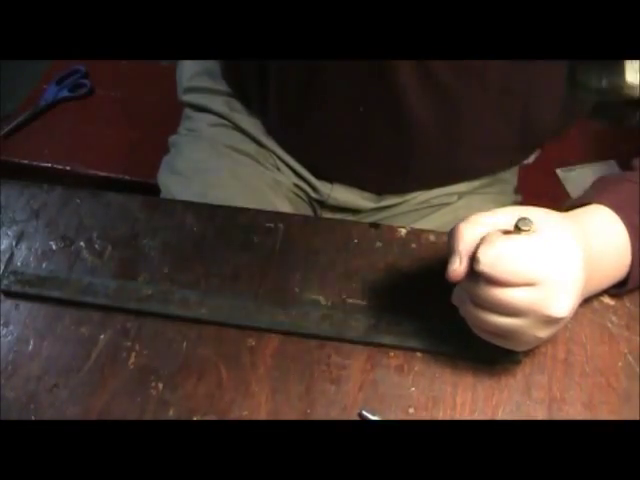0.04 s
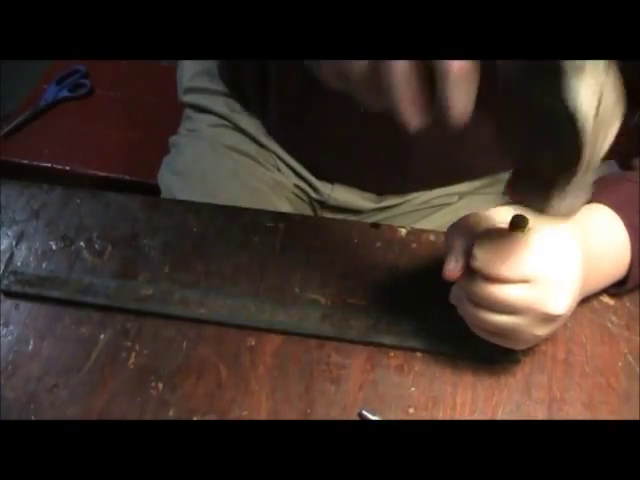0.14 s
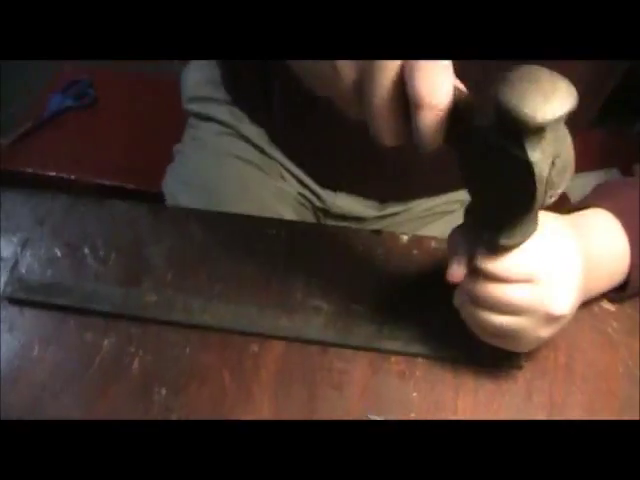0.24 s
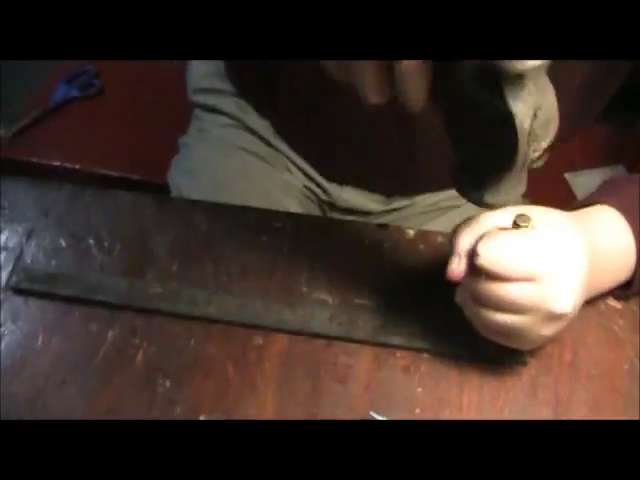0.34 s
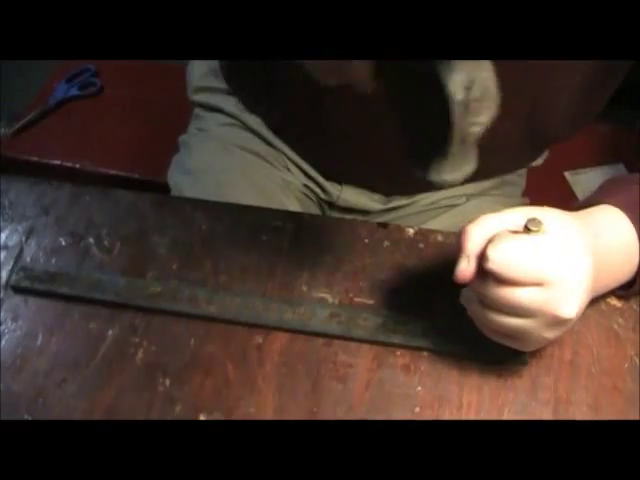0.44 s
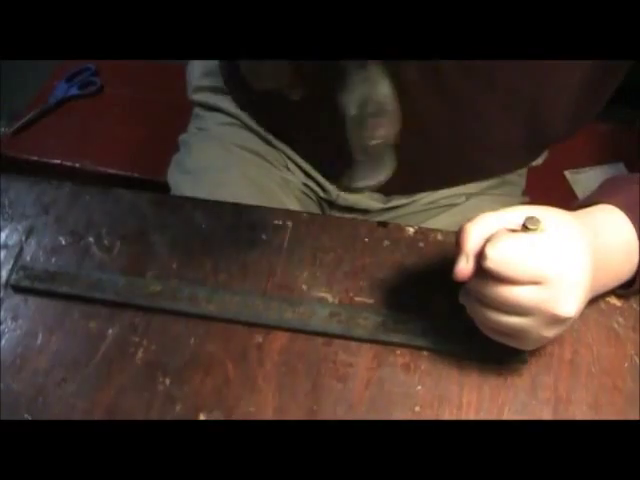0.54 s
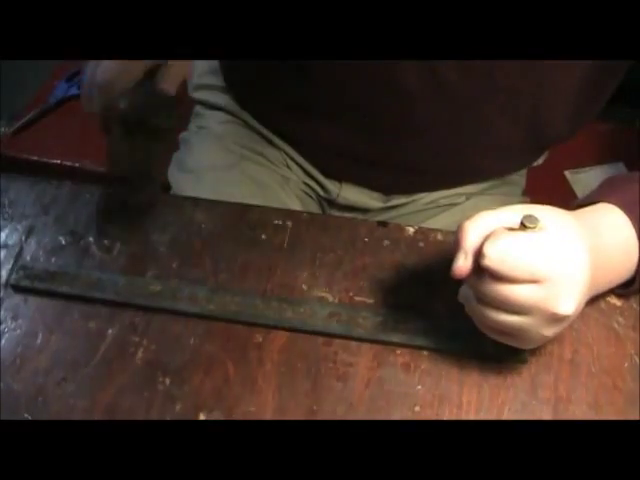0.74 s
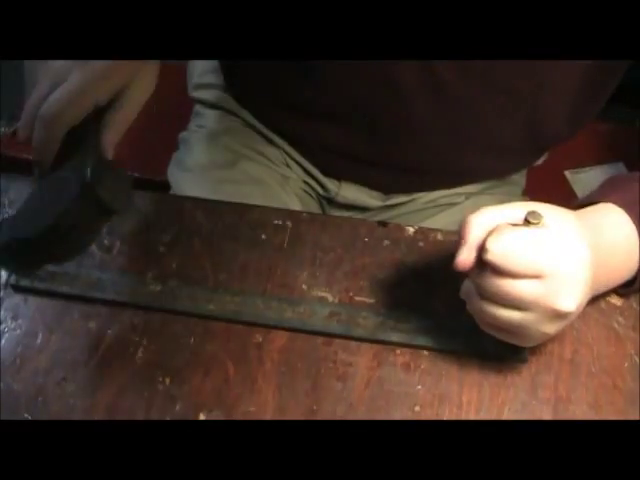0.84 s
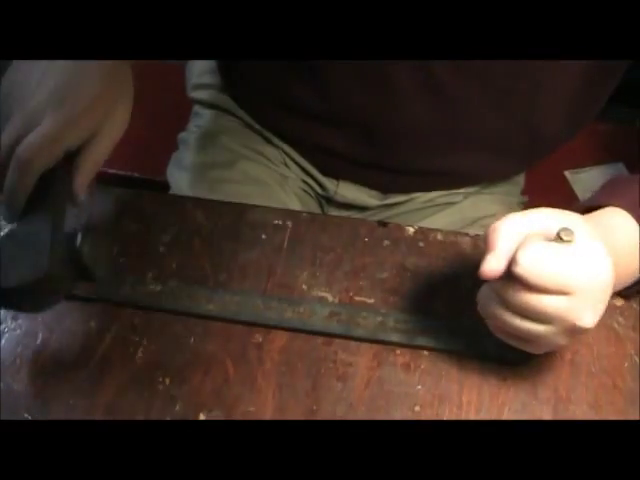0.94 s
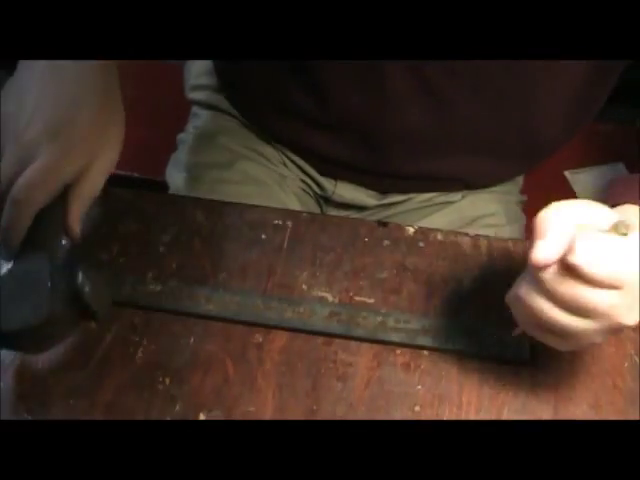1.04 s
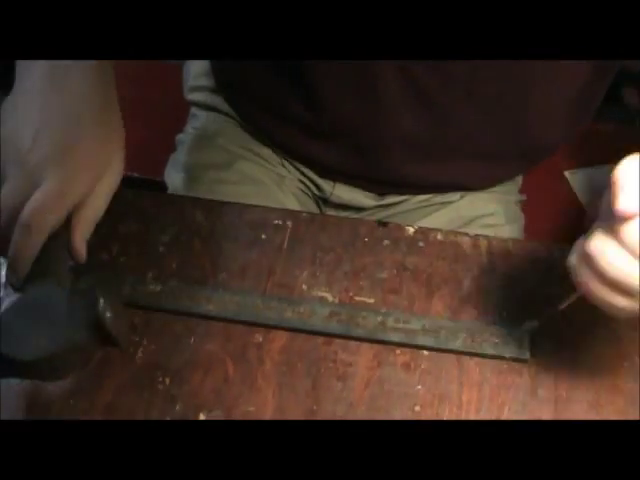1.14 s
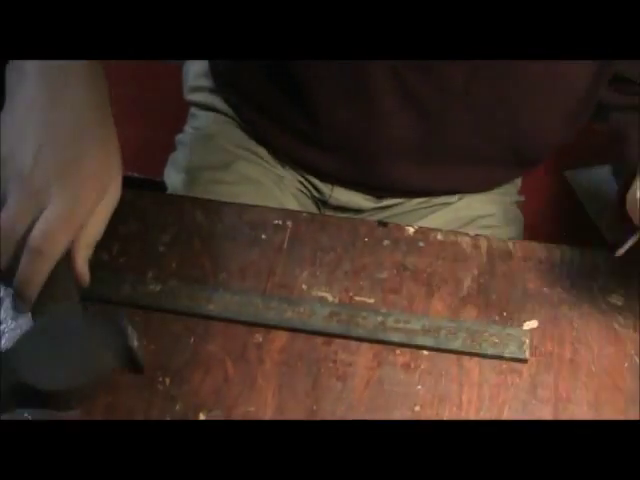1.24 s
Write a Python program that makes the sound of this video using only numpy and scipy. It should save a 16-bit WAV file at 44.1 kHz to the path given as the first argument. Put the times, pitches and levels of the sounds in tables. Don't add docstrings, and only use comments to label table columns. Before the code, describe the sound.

One hard hammer strike on metal at a workbench, bar rattling to rest with thin ringing

```python
import sys
import numpy as np
from scipy import signal
from scipy.fft import rfft, irfft
from scipy.io import wavfile
from scipy.ndimage import uniform_filter1d

SR = 44100
rng = np.random.default_rng(int(sys.argv[2]) if len(sys.argv) > 2 else 0)


def volts_from_decibels(level):
    exponent = np.asarray(level, float) / 20
    return 10 ** exponent


def unload_audio(sound):
    columns = np.transpose(np.atleast_2d(sound))
    steps = np.round(np.clip(columns, -1, 1) * 32767)
    wavfile.write(sys.argv[1], SR, steps.astype(np.int16))


N = 57330
T = np.arange(N) / SR
BLOW_S = .2114


def evened(x):
    return x / np.sqrt(np.mean(x ** 2) + 1e-20)


def read(points, hz):
    f, value = np.transpose(points)
    return np.interp(np.log(hz + 1), np.log(f + 1), value)


def curve(table, column):
    rows = np.array(table)
    return np.interp(T, rows[:, 0], rows[:, column])


def colour(x, points):
    log_gain = np.log(volts_from_decibels(read(points, abs(np.fft.fftfreq(4096, 1 / SR)))))
    phase = -signal.hilbert(log_gain).imag
    taps = np.fft.ifft(np.exp(log_gain + 1j * phase)).real[:2048]
    return signal.oaconvolve(x, taps[None] / np.linalg.norm(taps), axes=1)[:, :N]


def pair(same, source=None):
    middle, side = rng.standard_normal((2, N))
    if source is not None:
        middle, side = source, source * np.sign(side)
    likeness = np.clip(read(same, np.fft.rfftfreq(N, 1 / SR)), 0, 1)
    m = np.sqrt((1 + likeness) / 2) * rfft(middle)
    s = np.sqrt((1 - likeness) / 2) * rfft(side)
    return irfft(np.array([m + s, m - s]), N)


def fall(start_s, t60, rise=.0002):
    t = np.maximum(T - start_s, 0)
    return np.minimum(t / rise, 1) * volts_from_decibels(-60 * t / t60)


def banded(x, start_s, t60s):
    octave = np.log2(np.fft.rfftfreq(N, 1 / SR) + 1)
    spectrum, out = rfft(x), 0
    elapsed = np.maximum(T - start_s, 0)
    for k in range(4, 16):
        share = np.clip(1 - abs(octave - k), 0, 1)
        out = out + irfft(spectrum * share, N) * volts_from_decibels(-60 * elapsed / read(t60s, 2. ** k))
    return out


def modes(start_s, rows):
    out = 0
    for hz, db, t60, rise in rows:
        phase, skew = rng.random(2) * [1, .04]
        if hz <= 150:
            phase = 1 / 4
        turns = hz * (T - start_s) + phase + np.array([[0], [skew]])
        out = out + volts_from_decibels(db) * fall(start_s, t60, rise) * np.sin(2 * np.pi * turns)
    return out


# f/Hz, t60/s
ROOM_T60 = [(100, 0.82), (500, 0.81), (2000, 0.42), (6000, 0.14), (14000, 0.38)]
ROOM_DB = -18.5


def room(x):
    taps = np.zeros((2, N))
    at = np.arange(200, N - 20, 20) + rng.integers(0, 20, (2, (N - 201) // 20))
    np.put_along_axis(taps, at, rng.choice([-1., 1.], at.shape), 1)
    tail = banded(taps + 0.69 * taps[::-1], 0, ROOM_T60)
    return signal.fftconvolve(x.mean(0)[None], tail / np.linalg.norm(tail[0]), axes=1)[:, :N]


# t/s, rumble level/dB, hum offset/dB, hiss level/dB
BACKGROUND = [(0, -47, 3, -124), (.1, -49.5, 2.5, -67), (.2, -51.5, -1, -65), (.3, -59, -6, -87),
              (.72, -44, -1.5, -95), (.81, -43.5, 1.5, -60.5), (.9, -43.5, 3.5, -56.5),
              (1.0, -43, 5.5, -55.5), (1.12, -45.5, 6, -62.5), (1.3, -48, 3.5, -51)]
# f/Hz, level per Hz/dB
RUMBLE = [(20, -22.5), (60, 3), (185, -1.5), (550, 1), (700, -5), (3000, -12.5), (8000, -31.5),
          (15400, -46.5)]
# f/Hz, level per Hz/dB
HISS = [(1500, -23), (4000, 0.5), (7000, -0.5), (11000, -11), (13500, -11.5), (15000, -32)]
# f/Hz, left-right likeness/0-1
AIR_SAME = [(60, 0.77), (240, 0.8), (950, 0.68), (3770, 0.17), (15000, 0.068)]
# f/Hz, left minus right/dB
LEAN = [(60, -3.5), (240, -0.5), (950, -1), (3770, -1.5), (15000, -14)]


def air():
    lean = volts_from_decibels(np.array([[.5], [-.5]]) * read(LEAN, np.fft.rfftfreq(N, 1 / SR)))
    rumble = irfft(rfft(colour(pair(AIR_SAME), RUMBLE)) * lean, N)
    hiss = colour(pair(AIR_SAME), [(20, -78)] + HISS)
    return rumble * volts_from_decibels(curve(BACKGROUND, 1)) + hiss * volts_from_decibels(curve(BACKGROUND, 3))


# f/Hz, level/dB
HUM = [(59.2, -64.5), (177.6, -56.5), (236.9, -57.5), (296.1, -64), (423, -59.5), (483, -59.5),
       (565.2, -52.5), (646.0, -66.5)]
HUM_WAVER_HZ, HUM_NOISE_DB = 8, -12


def hum():
    r, out = np.exp(-np.pi * HUM_WAVER_HZ / SR), 0
    for hz, db in HUM:
        a, b = rng.standard_normal((2, N))
        halo = signal.lfilter([1], [1, -r], a + 1j * b) * np.sqrt((1 - r * r) / 2)
        carrier = np.exp(2j * np.pi * (hz * T + rng.random()))
        out = out + volts_from_decibels(db) * np.sqrt(2) * ((1 + volts_from_decibels(HUM_NOISE_DB) * halo) * carrier).real
    return out * volts_from_decibels(curve(BACKGROUND, 2)) * volts_from_decibels(np.array([[-1.2], [1.2]]))


# f/Hz,
# level/dB, t60/s, rise/s
KNOCKS = [(3700, -22, .003, .0003), (4500, -20, .005, .0003), (6500, -26, .006, .0003),
          (6900, -23, .01, .0003), (1110, -31, .075, .002), (560, -31, .03, .0015), (620, -34, .03, .001),
          (570, -39, .04, .002), (1100, -43, .12, .001), (2230, -51.5, .4, .012), (1160, -44, .2, .003),
          (1850, -44, .03, .001), (2330, -55, .2, .01), (4000, -58, .3, .01), (3800, -55, .1, .003)]
KNOCK_AT = [.9088, .4035, .4355, .478, .9278, .9285, .953, 1.001, .74, 1.25, .897, .935, 1.283, 1.272,
            1.218]


def knocks():
    return sum(modes(s, [row]) for s, row in zip(KNOCK_AT, KNOCKS))


# level/dB, t60/s, rise/s
RING = [(-46, 2.4, .03), (-37, 1.6, .03), (-27, .55, .09), (-39, .25, .004), (-57, 1.5, .01),
        (-50, .7, .005), (-44, .28, .004), (-47.5, .42, .004), (-55, .6, .05), (-58, .7, .02)]
# t/s, f/Hz
RING_AT = [(.629, 5670.9), (.45, 5661), (.476, 5661), (.376, 5661), (.25, 10757), (.376, 10757),
           (.449, 10757), (.498, 10757), (.52, 10768), (.26, 10985)]
IN_STEP_S = .633, .648
GRIP_S, GRIP_DB_PER_S = 1.08, 95


def ring():
    tone = 0
    for (start_s, hz), (db, t60, rise) in zip(RING_AT, RING):
        in_step_s = IN_STEP_S[int(hz > 8000)]
        tone = tone + volts_from_decibels(db) * fall(start_s, t60, rise) * np.sin(2 * np.pi * hz * (T - in_step_s))
    grip_db = GRIP_DB_PER_S * np.maximum(T - GRIP_S, 0)
    return np.sqrt(2) * tone * volts_from_decibels(np.array([[-3], [2.2]]) - grip_db)


# f/Hz, left-right likeness/0-1
HIT_SAME = [(60, 1), (240, 1), (950, 0.82), (3000, 0.37), (15000, 0.12)]
# t/s, level/dB, jingle level/dB
CHATTER = [(.23, -12, -64), (.27, -24.5, -43), (.35, -29, -79), (.39, -29, -33), (.44, -33.5, -33),
           (.48, -31, -31.5), (.53, -34, -32.5), (.6, -38.5, -53), (.7, -51.5, -91)]
# f/Hz, level per Hz/dB
CHATTER_TONE = [(60, -42), (150, 6.5), (400, -9), (1700, 4.5), (3200, 3), (6000, -6.5), (10500, -22),
                (12500, -45.5)]
# f/Hz, level per Hz/dB
JINGLE = [(1500, 0.5), (3500, 4.5), (7000, 1.5), (10000, -15), (12000, -28), (15000, -63)]
CHATTER_PER_S, CHATTER_SPREAD_DB = 6000, 2.2


def chatter():
    sizes = volts_from_decibels(CHATTER_SPREAD_DB * np.minimum(rng.exponential(1, N), 4))
    ticks = sizes * (rng.random(N) < CHATTER_PER_S / SR) * rng.choice([-1, 1], N)
    ticks = pair(HIT_SAME, evened(ticks))
    dull = colour(ticks, CHATTER_TONE) * volts_from_decibels(curve(CHATTER, 1))
    bright = colour(ticks, JINGLE) * volts_from_decibels(curve(CHATTER, 2))
    rest_db = 25 * np.maximum(T - CHATTER[-1][0], 0)
    return (dull + bright) * volts_from_decibels(np.array([[-1], [1]]) - rest_db) * (T > BLOW_S)


# f/Hz, level/dB, t60/s, rise/s
CONTACTS = [(4180, -6, 0.012, 0.00015), (9900, -19, 0.0062, .0002), (3010, -12, 0.014, 0.00027),
            (5340, -19, 0.013, 0.00027), (4740, -11.5, 0.012, .0001), (9670, -10.5, 0.004, .0001),
            (6660, -31, 0.015, .0003), (2480, -32, 0.016, 0.00033), (3050, -23, .025, 0.00038),
            (3270, -32, .015, 0.00013), (1320, -27, 0.022, 0.00041), (2600, -20, .015, 0.00023),
            (2020, -14.5, 0.0079, 0.00045)]
CONTACT_AT = [.3762, .3763, .3787, .3768, .4482, .4482, .4518, .4565, .5017, .5065, .503, .5235, .5265]


def contacts():
    return sum(modes(s, [row]) for s, row in zip(CONTACT_AT, CONTACTS))


# peak level/dB, first touch level/dB, gap to the full landing/ms, t60/s, hardness/0-1
LANDINGS = [
    (-14, -4, 3.5, .06, .2),
    (-12, -5, 2.6, .026, 1),
    (-13, 1, 2.7, .026, 1),
    (-15, -1, 3.2, .045, .65),
]
LANDING_AT = [.2685, .3737, .4481, .4978]
# f/Hz, level per Hz/dB
HARD = [(120, -39), (200, -14), (748, 0), (1540, -7), (3060, 6), (5360, -5), (6650, -3), (13200, -20.5),
        (15000, -67)]
# f/Hz, level per Hz/dB
SOFT = [(300, -2.5), (2500, 19), (5000, -18.5), (15000, -29)]
# f/Hz, level per Hz/dB
TICK = [(300, -12), (1000, 16), (3500, -5), (9000, 7.5), (14500, -46)]
# f/Hz, width/Hz, level/dB
BAR = [(2060, 140, 7.5), (2780, 210, 9), (3970, 330, -27.5), (5350, 130, -24), (6100, 280, -2),
       (6750, 227, 14), (8230, 160, -3), (11500, 310, -39.5)]
TICK_DB, CLACK_DB, LAND_PAN_DB = 10, -6, -2.5


def landings():
    noise, out, ticks = pair(HIT_SAME), 0, np.zeros((2, N))
    hard, soft = colour(noise, HARD), colour(noise, SOFT)
    bar = [(hz, db, 1.83 / width, 0.00062) for hz, width, db in BAR]
    for s, (db, touch_db, gap_ms, t60, hardness) in zip(LANDING_AT, LANDINGS):
        for at, part_db in ((s, touch_db), (s + gap_ms / 1000, 0)):
            burst = (hardness * hard + (1 - hardness) * soft) * fall(at, t60)
            clack = hardness * volts_from_decibels(CLACK_DB) * 0.67 * modes(at, bar)
            out = out + volts_from_decibels(db + part_db) * (0.9 * burst + clack)
            ticks[:, round(at * SR)] = hardness ** 2 * volts_from_decibels(db + part_db + TICK_DB)
    return (out + colour(ticks, TICK)) * volts_from_decibels(np.array([[.5], [-.5]]) * LAND_PAN_DB)


# f/Hz, level per Hz/dB
BLOW = [(30, -45), (110, -9), (300, -9), (600, -1), (1100, 0), (1550, -8), (2700, 0.5), (4500, -11.5),
        (7800, -6), (15000, -33.5)]
# f/Hz, t60/s
BLOW_T60 = [(60, 0.1), (300, 0.037), (1000, 0.033), (3000, 0.031), (8000, 0.0048), (15000, 0.0452)]
# f/Hz, level/dB, t60/s, rise/s
BENCH = [(453, -8.5, 0.13, 0.0058), (289.6, 12, 0.077, 0.01), (539.7, -2.5, 0.19, 0.0033),
         (1096, -2, 0.082, 0.0023), (1200, 3.5, .1, .005), (405.7, -8, 0.3, .008), (650.5, 0, 0.14, 0.0028),
         (240.3, -11, 0.35, 0.0062), (1817, -0.5, .12, 0.0031), (2332, -3.5, 0.13, 0.0031),
         (171.4, -4.5, 0.2, 0.012), (321, -3.5, 0.14, 0.0067), (775, -0.5, .1, 0.0031),
         (1282, -9.5, 0.23, 0.0066),
         (106, 6, .06, .001), (365, -7, .25, .008), (109, -7, .42, .003)]
BLOW_DB, BLOW_HOLD_S, BENCH_DB = 10, .006, -10


def blow():
    crash = banded(colour(pair(HIT_SAME), BLOW), BLOW_S + BLOW_HOLD_S, BLOW_T60) * (T > BLOW_S)
    return volts_from_decibels(BLOW_DB) * crash + volts_from_decibels(BENCH_DB) * modes(BLOW_S, BENCH)


def scene():
    near = blow() + landings() + chatter() + knocks() + contacts()
    return near + volts_from_decibels(ROOM_DB) * room(near) + ring() + hum() + air()


def drop_weak_top(x):
    hz, _, z = signal.stft(x, SR, nperseg=1024)
    power = uniform_filter1d((abs(z) ** 2).mean(0), size=8, axis=0)
    treble = power[(hz > 2000) & (hz < 8000)].mean(0)
    keep = (hz[:, None] < 9600) | (power > treble * volts_from_decibels(2 * -31))
    return signal.istft(z * keep, SR, nperseg=1024)[1][:, :N]


def band_limit(x):
    return signal.sosfilt(signal.butter(12, 15570, fs=SR, output="sos"), x)


def record(dry):
    ceiling, knee = 1.0, 6
    clipped = dry / (1 + abs(dry / ceiling) ** knee) ** (1 / knee)
    edge = signal.firwin(255, 15600, window=("kaiser", 5), fs=SR)[None]  # low-pass, Hz
    limited = signal.oaconvolve(drop_weak_top(clipped), edge, "same")
    return band_limit(np.clip(limited, -1, 1))


dry = scene()
out = record(dry)
unload_audio(out)
```